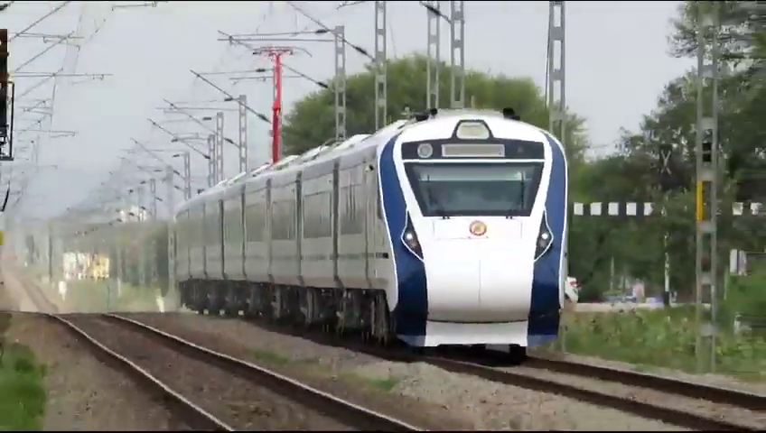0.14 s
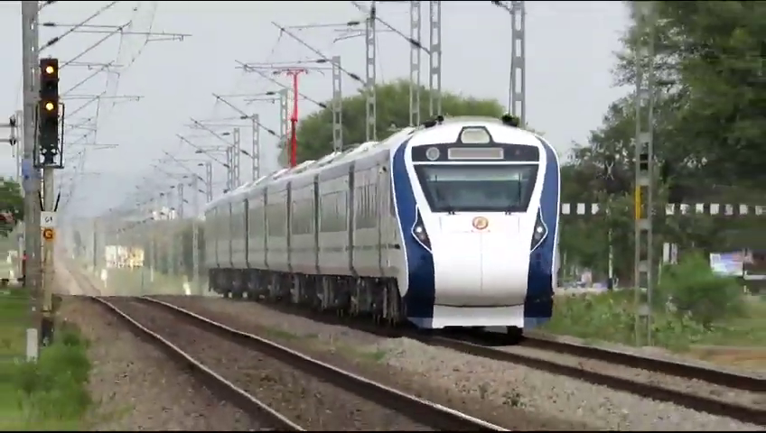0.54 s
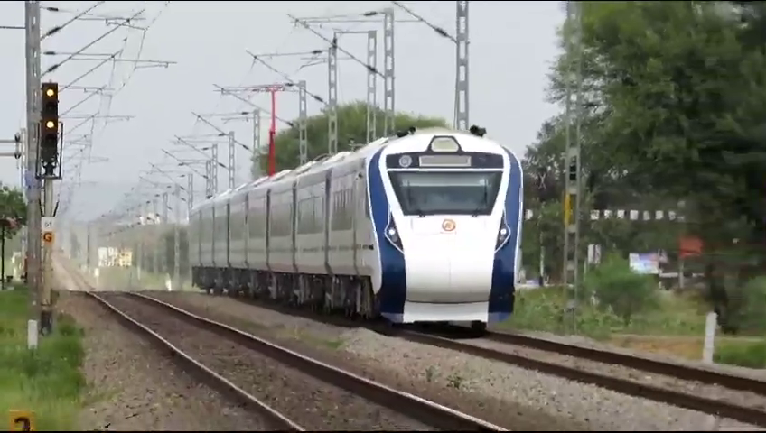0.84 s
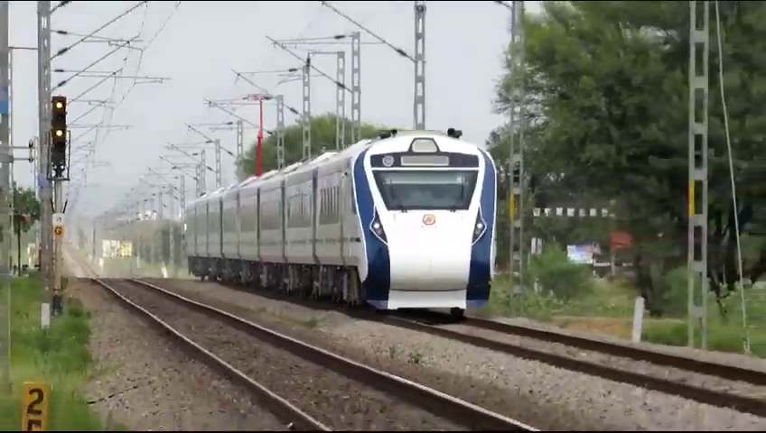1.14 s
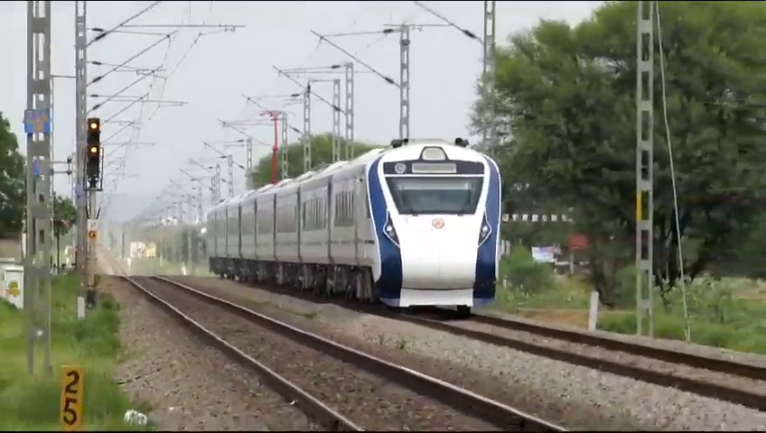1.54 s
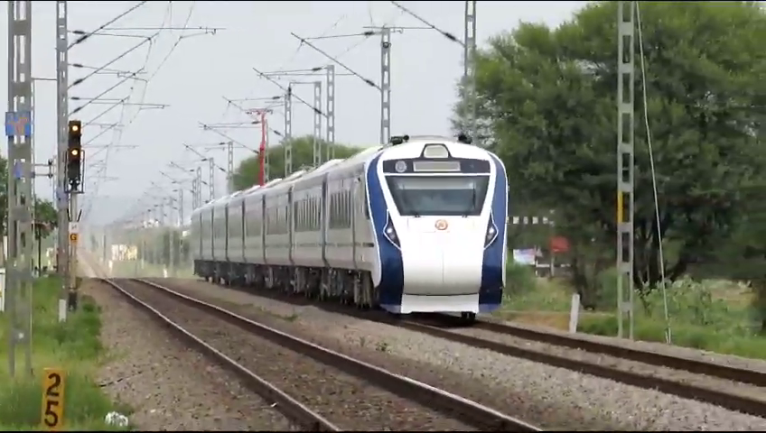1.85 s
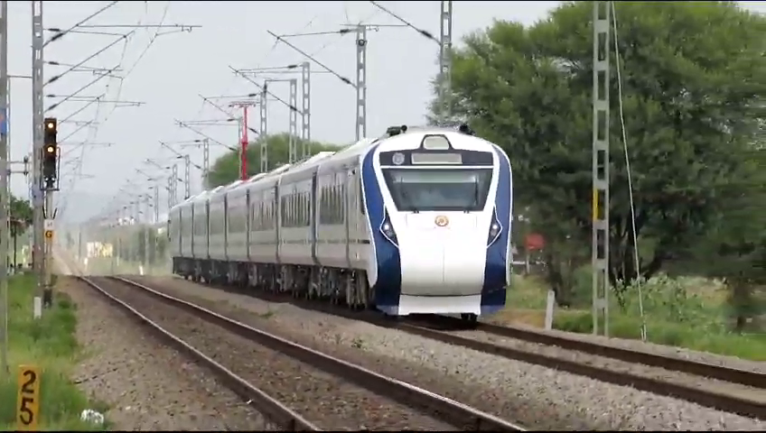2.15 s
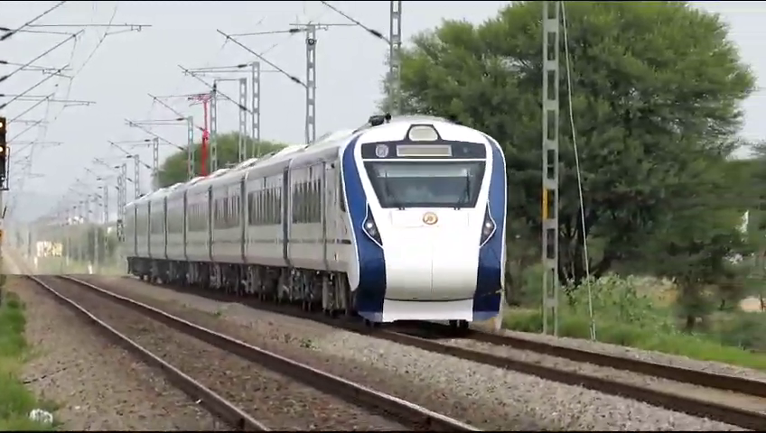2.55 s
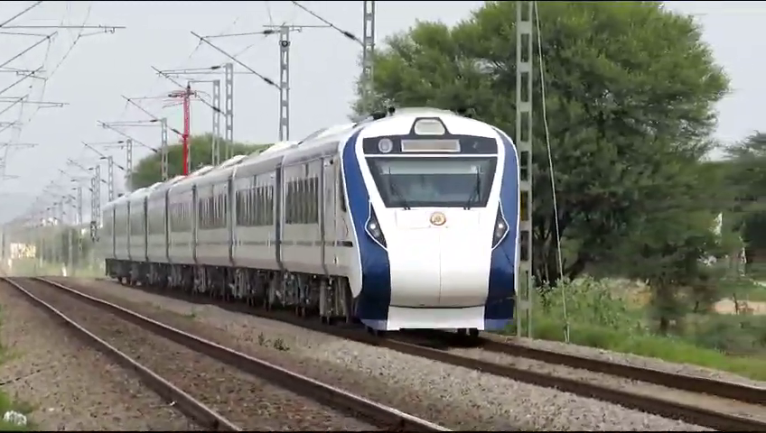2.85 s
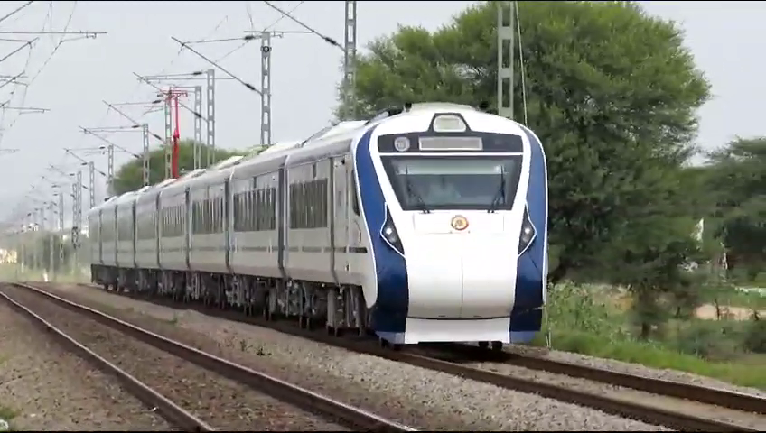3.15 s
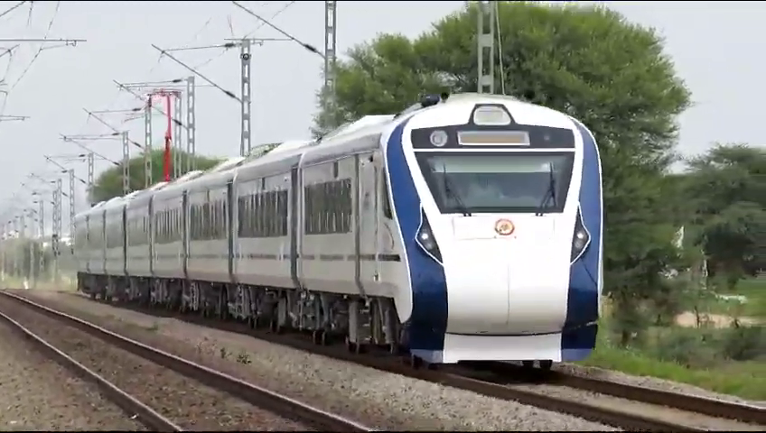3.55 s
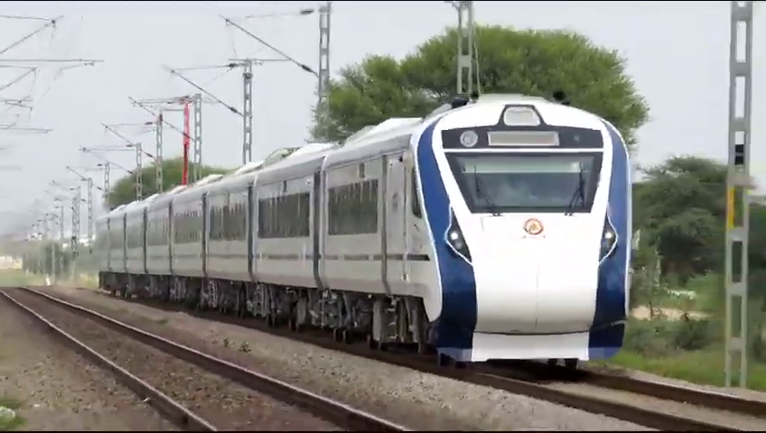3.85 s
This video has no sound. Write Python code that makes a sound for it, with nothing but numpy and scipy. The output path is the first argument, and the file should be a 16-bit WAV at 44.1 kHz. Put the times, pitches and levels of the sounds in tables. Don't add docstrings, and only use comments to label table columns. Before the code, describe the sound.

Train air horn blares for two seconds after windy rumble and faint ringing rails on an open track

```python
import sys
import numpy as np
from scipy import signal
from scipy.fft import rfft, irfft
from scipy.io import wavfile

SR = 44100
rng = np.random.default_rng(int(sys.argv[2]) if len(sys.argv) > 2 else 0)


def decibels_to_gain(level_db):
    exponent = np.asarray(level_db, float) / 20
    return 10 ** exponent


def generate_wav(signal):
    frames = np.transpose(np.atleast_2d(signal))
    scaled = np.clip(frames, -1, 1) * 32767
    pcm = np.round(scaled).astype(np.int16)
    wavfile.write(sys.argv[1], SR, pcm)


N = 176400
TIME_S = np.arange(N) / SR
LEFT_RIGHT = np.array([[1], [-1]])

# time_s, fundamental_db, brightness_db_per_multiple
HORN_VALVE = [
    (2.049, -36, 6),
    (2.059, -13, -8),
    (2.077, -13.5, -1.5),
    (2.12, -11.5, -0.53),
    (3.0, -13, -0.2361),
    (3.499, -13, 0.25),
    (3.821, -12.5, 0),
    (3.939, -16, -3),
    (4.0, -43, 1),
]
# multiple, level_db
HORN_PARTIALS = [(1, -3), (2, -7), (3, -8), (4, -13), (5, -18), (6, -22), (7, -23), (8, -30), (9, -29),
                 (10, -36), (11, -37), (12, -45), (13, -44), (14, -45), (15, -49), (16, -53), (17, -54),
                 (18, -59), (19, -62), (20, -68)]
# multiple, time_s, level_db, half_length_s
PATH_FADES = [(1, 2.38, 2.7, 0.029), (1, 2.664, -3.3, 0.03), (1, 2.936, -3.1, 0.035),
              (1, 3.574, -3.2, 0.07), (1, 3.576, 6.4, 0.2), (2, 2.158, -13.1, 0.097),
              (2, 2.412, -6.1, 0.052), (2, 2.681, -4.9, 0.093), (2, 2.788, 3.0, 0.033),
              (2, 2.96, 1.7, 0.066), (2, 3.337, -10.7, 0.2), (2, 3.861, -4.6, 0.058),
              (3, 2.183, 5.5, 0.051), (3, 2.414, -7.4, 0.145), (3, 2.635, 4.4, 0.03),
              (3, 2.907, -6.0, 0.02), (3, 2.909, -3.3, 0.192), (3, 3.314, -9.5, 0.042),
              (3, 3.542, -12.0, 0.156), (3, 3.604, -9.0, 0.033), (4, 2.081, -18.8, 0.061),
              (4, 2.201, -17.8, 0.029), (4, 2.323, -6.2, 0.06), (4, 2.489, 3.8, 0.185),
              (4, 2.957, 2.9, 0.02), (4, 3.093, 6.3, 0.058), (4, 3.401, 5.2, 0.117),
              (4, 3.607, -13.3, 0.064), (5, 2.181, -15.4, 0.03), (5, 2.301, 8.0, 0.149),
              (5, 2.312, -23.7, 0.063), (5, 2.773, -7.0, 0.117), (5, 3.061, -14.8, 0.053),
              (5, 3.219, 5.3, 0.04), (5, 3.445, -11.8, 0.027), (5, 3.733, -12.4, 0.036),
              (6, 2.138, -9.6, 0.023), (6, 2.359, 6.7, 0.047), (6, 3.035, -6.4, 0.056),
              (6, 3.269, -8.6, 0.063), (6, 3.861, -6.8, 0.152), (7, 2.137, 7.2, 0.073),
              (7, 2.487, -17.9, 0.028), (7, 2.77, 8.0, 0.087), (7, 3.115, -9.4, 0.039),
              (7, 3.883, -5.5, 0.019), (8, 2.809, 6.2, 0.113), (8, 3.28, -11.7, 0.063),
              (8, 3.481, 7.0, 0.074), (8, 3.794, 5.1, 0.041)]
# time_s, distance_across_s (train travel time), level_db
POSTS_PASSED = [
    (2.95, .14, -14),
    (4.3, .7, -21),
]
# time_s, half_length_s, level_db
BEAM_GLINT = (2.73, .1, -6)
# delay_s, level_db
LATE_ECHOES = [
    (.09, -29),
    (.14, -28),
    (.21, -29),
]
# time_s, level_db
RAIL_LEVEL = [(0.0, -44.5), (0.32, -36.5), (0.39, -70), (0.42, -39.5), (1.69, -43), (1.76, -29.5),
              (1.93, -43), (1.96, -32.5), (2.03, -42), (2.07, -31), (2.15, -47), (2.35, -36), (2.63, -42.5),
              (3.06, -38.5), (3.46, -38.5), (3.71, -44), (4.0, -53)]
# centre_hz, width_hz, level_db
RAIL_MODES = [
    (1186, 75, -4),
    (1289, 27.3, -5.5),
    (1255, 41, -6),
]
# time_s, peak_db
WHEEL_STRIKES = [(0.1436, -38), (0.2119, -42.5), (0.3446, -33.5), (0.4189, -34), (0.516, -32.5),
                 (0.564, -35), (0.6203, -26), (0.719, -33.5), (0.7896, -29), (0.8893, -35), (0.9453, -32.5),
                 (0.9882, -36.5), (1.043, -23), (1.0854, -43.5), (1.245, -30.5), (1.2885, -29),
                 (1.3458, -28.5), (1.4406, -35.5), (1.536, -31), (1.6402, -32.5), (1.707, -36),
                 (1.8317, -34), (1.8706, -30), (1.955, -29)]
# time_s, level_db
GUST_LEVEL = [(0.0, -31), (0.07, -38), (0.13, -42), (0.25, -32), (0.65, -42.5), (0.95, -47), (1.0, -33),
              (1.15, -51), (1.7, -48), (1.8, -40), (2.55, -30), (2.72, -49), (3.01, -29.5), (3.11, -38),
              (3.35, -40.5), (3.45, -46.5), (3.6, -37), (3.9, -53), (4.0, -31)]
# freq_hz, density_db_per_hz
WIND_SPECTRUM = [(12, -36), (20, -29.5), (48, -6.5), (70, -2.5), (114, -2), (191, -3.5), (267, -9.5),
                 (430, -14), (560, -24.5), (730, -61), (1230, -120)]
# time_s, peak_db, pitch_hz
WIND_THUMPS = [(0.01, -25, 267), (0.033, -22, 242), (0.249, -20.5, 159), (0.284, -25.5, 195),
               (0.309, -14, 244), (0.429, -16.5, 218), (0.443, -17, 320), (0.538, -17, 236),
               (0.585, -29, 205), (0.644, -26.5, 181), (0.843, -23.5, 197), (0.985, -15.5, 234),
               (1.036, -30, 283), (1.058, -26.0, 143), (1.2, -28.0, 254), (1.633, -25.5, 160),
               (1.761, -20.5, 132), (1.776, -21, 208), (1.882, -24, 201), (1.896, -22, 170),
               (2.008, -25, 220), (2.053, -23, 180), (2.107, -24, 154), (2.125, -23, 158),
               (2.218, -20.5, 186), (2.253, -17.5, 156), (2.28, -19, 206), (2.34, -15.5, 248),
               (2.38, -14.5, 205), (2.398, -19, 223), (2.416, -15, 190), (2.49, -15, 162),
               (2.519, -15, 240), (2.533, -15.5, 156), (2.671, -15.5, 149), (2.851, -14.5, 218),
               (2.932, -27, 159), (2.969, -21, 200), (2.996, -13.5, 222), (3.015, -20.5, 164),
               (3.034, -20.0, 172), (3.177, -21, 162), (3.217, -11, 177), (3.239, -25, 142),
               (3.352, -21, 135), (3.549, -18, 196), (3.563, -26.5, 129), (3.635, -26.5, 282),
               (3.763, -24.5, 273), (3.991, -23, 234)]
# time_s, level_db
BUFFET_LEVEL = [(0, -41.5), (.6, -43.5), (1.4, -48.5), (1.8, -38), (2.2, -34), (3.2, -39.5), (3.5, -41),
                (4, -49)]
# time_s, level_db
ROLL_LEVEL = [(0.0, -58), (0.83, -59), (1.68, -55), (1.78, -47.5), (2.15, -44.5), (2.17, -46.5),
              (3.25, -50), (3.5, -43), (3.54, -33.5), (3.71, -48), (4.0, -46)]
# freq_hz, density_db_per_hz
ROLL_SPECTRUM = [(500, -15.5), (700, -2.5), (950, 1.5), (1300, 1.5), (1700, -13), (2600, -20),
                 (5000, -31.5), (15000, -49)]
# pitch_hz, level_db
FAR_PARTIALS = [
    (430.7, -52),
    (866.7, -61),
]
# time_s, level_db
FAR_LEVEL = [
    (.15, -42),
    (.19, 3.5),
    (.68, 6),
    (.92, 6),
    (1.02, -9),
    (1.5, -8),
    (1.7, -38),
]
# freq_hz, density_db_per_hz
AIR_SPECTRUM = [(880, -2), (1500, -11.5), (1620, 1), (3270, -4.5), (3570, -4.5), (9630, -14.5),
                (11900, -27), (15000, -71.5)]
# fall_start_s, fall_end_s, rise_start_s, rise_end_s
DUCK_TIMES = (2.05, 2.1, 3.9, 4.0)

HORN_HZ, SAG_HZ_PER_S, START_SHARP_HZ, SETTLE_S = 747.75, 3.2, 34.04, 0.1
CLOSE_S, CLOSE_HZ_PER_S, EDGE_S = 3.79, 140, .006
FADE_SHARE, FADE_GROWTH, FADE_MOST, FADE_PER_S, LISTED_SHARE = .05, .08, .75, 7.0, .3
SHIMMER, SHIMMER_PER_S = .06, 22
SIDE_DB, SIDE_DB_PER_OCT = -36, 7
MACH, BLUR_S, BEHIND = .077, .00005, .1
BUSHES_DB, BUSH_ACROSS_S, ECHO_FLICKER_DB = -32.5, 0.92, 4
ECHO_CUT_HZ, GLINT_BAND_HZ = 2800, (2600, 5600)
THROB_DB, RAIL_TOP_HZ = 2, 1330
HIT_RISE_S, HIT_RING_S, HIT_DB = .003, 0.025, -10.5
LUMP_DB, LUMPS_PER_S = 3.5, 30
THUMP_CYCLES, THUMP_DB, BUFFET_HZ = 0.53, 1.5, 102
WIND_SIDE_DB, WIND_SIDE_HZ, WIND_TOP_HZ = -4.5, 300, 527
AIR_DB, DUCK_DB, DUCK_ABOVE_HZ = -62, -12, 1600


def in_time(rows):
    s, *columns = np.transpose(rows)
    return [np.interp(TIME_S, s, c) for c in columns]


def rms_one(x):
    return x / np.sqrt(np.mean(x ** 2) + 1e-20)


def drift(per_s):
    r = np.exp(-80 * np.pi * per_s / SR)
    noise = rng.standard_normal(N // 40 + 2002)
    slow = signal.lfilter([1], [1, -2 * r, r * r], noise)[2000:]
    return np.interp(np.arange(N) / 40, np.arange(len(slow)), rms_one(slow - slow.mean()))


def coloured(spectrum):
    hz, db = np.transpose(spectrum)
    log_hz = np.log(np.arange(N // 2 + 1) * SR / N + 1)
    shape = decibels_to_gain(np.interp(log_hz, np.log(hz), db, left=-90, right=-90))
    return rms_one(irfft(rfft(rng.standard_normal(N)) * shape, N))


def cut(x, hz, kind, order=2):
    return signal.sosfilt(signal.butter(order, hz, kind, fs=SR, output="sos"), x)


def wide(make, side_db):
    return make() + decibels_to_gain(side_db) * make() * LEFT_RIGHT


def horn():
    t = TIME_S - HORN_VALVE[0][0]
    valve_db, bright_db = in_time(HORN_VALVE)
    hz = HORN_HZ - SAG_HZ_PER_S * t + START_SHARP_HZ * np.exp(-np.abs(t) / SETTLE_S)
    hz = hz + CLOSE_HZ_PER_S * np.maximum(TIME_S - CLOSE_S, 0)
    phase = 2 * np.pi * np.cumsum(hz) / SR
    onset = np.clip(t / EDGE_S, 0, 1) ** 2
    bell, mid, side = np.zeros((3, N))
    for k, level_db in HORN_PARTIALS:
        level = onset * np.sqrt(2) * decibels_to_gain(valve_db + level_db + bright_db * (k - 1))
        wave = level * np.exp(1j * (k * phase + rng.uniform(0, 2 * np.pi)))
        fades = [fade_db * np.exp(-((TIME_S - s) / half_s) ** 2)
                 for multiple, s, fade_db, half_s in PATH_FADES if round(multiple) == k]
        share = min(FADE_SHARE + FADE_GROWTH * (k - 1), FADE_MOST) * (LISTED_SHARE if fades else 1)
        swell = share * (drift(FADE_PER_S) + 1j * drift(FADE_PER_S)) / np.sqrt(2)
        paths = decibels_to_gain(sum(fades)) * (1 + swell) / np.sqrt(1 + share ** 2)
        scatter = np.conj(signal.hilbert(drift(SHIMMER_PER_S * np.sqrt(k)))) / np.sqrt(2)
        shimmer = SHIMMER * np.sqrt(2 * k) * scatter
        side_level = decibels_to_gain(SIDE_DB + SIDE_DB_PER_OCT * np.log2(k))
        bell += wave.real
        mid += (wave * (paths + shimmer)).real
        side += (wave * side_level * (drift(15) + 1j * drift(9.8))).real
    return bell, mid + side * LEFT_RIGHT


def passing_echoes(bell):
    out = np.zeros((2, N))
    bushes = [(1.5 + 5.5 * a, BUSH_ACROSS_S * (0.34 + b), BUSHES_DB + 6 * c)
              for a, b, c in rng.random((14, 3))]
    for s, across_s, db in POSTS_PASSED + bushes:
        away_s = np.sqrt((TIME_S - s) ** 2 + across_s ** 2)
        delay_s = MACH * (TIME_S - s + away_s) + 0.011 + BLUR_S * drift(26)
        facing = BEHIND + ((1 - (TIME_S - s) / away_s) / 2) ** 2
        pan = decibels_to_gain(rng.normal(0, 0.47) * LEFT_RIGHT)
        gain = decibels_to_gain(db + ECHO_FLICKER_DB * drift(5.3)) * facing * np.sqrt(across_s / away_s) * pan
        out += gain * np.interp(TIME_S - delay_s, TIME_S, bell)
    return out


def late_echoes(bell):
    out = np.zeros(N)
    for delay_s, db in LATE_ECHOES:
        arrival_s = TIME_S - delay_s - BLUR_S * drift(7)
        out += decibels_to_gain(db + ECHO_FLICKER_DB * drift(6.6)) * np.interp(arrival_s, TIME_S, bell)
    return out


def beam_glint(bell):
    s, across_s, _ = POSTS_PASSED[0]
    middle_s, half_s, db = BEAM_GLINT
    delay_s = MACH * (TIME_S - s + np.sqrt((TIME_S - s) ** 2 + across_s ** 2))
    treble = np.interp(TIME_S - delay_s, TIME_S, cut(bell, GLINT_BAND_HZ, "band"))
    return decibels_to_gain(db) * np.exp(-((TIME_S - middle_s) / half_s) ** 2) * treble


def echoes(bell):
    return cut(passing_echoes(bell) + late_echoes(bell), ECHO_CUT_HZ, "low") + beam_glint(bell)


def rails():
    ring = np.zeros(N)
    for hz, width_hz, db in RAIL_MODES:
        r = np.exp(-np.pi * width_hz / SR)
        edge = (1 - r * r) / 2
        resonator = [edge, 0, -edge, 1, -2 * r * np.cos(2 * np.pi * hz / SR), r * r]
        mode = signal.sosfilt(np.array([resonator, resonator]), rng.standard_normal(N))
        ring += decibels_to_gain(db + THROB_DB * drift(18.5)) * rms_one(mode)
    level = decibels_to_gain(in_time(RAIL_LEVEL)[0] - 4.0)
    for s, db in WHEEL_STRIKES:
        rise = np.clip((TIME_S - s) / HIT_RISE_S, 0, 1) ** 2
        level += decibels_to_gain(db + HIT_DB) * rise * np.exp(-np.abs(TIME_S - s) / HIT_RING_S)
    return level * rms_one(cut(ring, RAIL_TOP_HZ, "low", order=12))


def thumps():
    out = np.zeros(N)
    for s, db, hz in WIND_THUMPS:
        cycles = (TIME_S - s - .004) * hz
        packet = np.exp(-(cycles / THUMP_CYCLES) ** 2)
        out += decibels_to_gain(db + THUMP_DB) * packet * np.sin(2 * np.pi * cycles + rng.uniform(0, 2 * np.pi))
    return out


def buffeting():
    level = decibels_to_gain(in_time(BUFFET_LEVEL)[0] + 2.5 * drift(8))
    return level * rms_one(cut(coloured(WIND_SPECTRUM), BUFFET_HZ, "low"))


def wind():
    lumps = decibels_to_gain(in_time(GUST_LEVEL)[0] + 1 + LUMP_DB * drift(LUMPS_PER_S))
    hits = thumps()
    late_hits = np.roll(hits, int(0.0013 * SR))
    side = cut(lumps * coloured(WIND_SPECTRUM) + late_hits, WIND_SIDE_HZ, "high")
    mid = cut(hits + lumps * coloured(WIND_SPECTRUM), BUFFET_HZ, "high") + buffeting()
    return cut(mid + decibels_to_gain(WIND_SIDE_DB) * side * LEFT_RIGHT, WIND_TOP_HZ, "low", order=6)


def wheel_roll():
    level = decibels_to_gain(in_time(ROLL_LEVEL)[0] + 3 + 1.5 * drift(14))
    return level * wide(lambda: coloured(ROLL_SPECTRUM), -14)


def far_horn():
    note = np.zeros(N)
    for hz, db in FAR_PARTIALS:
        level = np.sqrt(2) * decibels_to_gain(db - 1.0 + 2 * drift(11))
        note += level * np.sin(2 * np.pi * hz * TIME_S + 0.5 * drift(9.5))
    return decibels_to_gain(in_time(FAR_LEVEL)[0]) * note


def far_air():
    return decibels_to_gain(AIR_DB) * wide(lambda: coloured(AIR_SPECTRUM), 2.3)


def floor_under_horn(floor):
    duck = decibels_to_gain(DUCK_DB * np.interp(TIME_S, DUCK_TIMES, [0, 1, 1, 0]))
    treble = cut(floor, DUCK_ABOVE_HZ, "high", order=3)
    return cut(floor, DUCK_ABOVE_HZ, "low", order=3) + duck * treble


def scene():
    bell, direct = horn()
    train = direct + echoes(bell) + wide(rails, -11.5)
    floor = floor_under_horn(wheel_roll() + far_air())
    return train + wind() + floor + far_horn()


def top_cut(x):
    return signal.sosfilt(signal.butter(12, 15340, fs=SR, output="sos"), x)


def record(dry):
    ending = np.clip(TIME_S[::-1] / EDGE_S, 0, 1)
    mix = ending * 1.51 * np.tanh(dry / 1.46)
    return top_cut(mix)


dry = scene()
out = record(dry)
generate_wav(out)
```